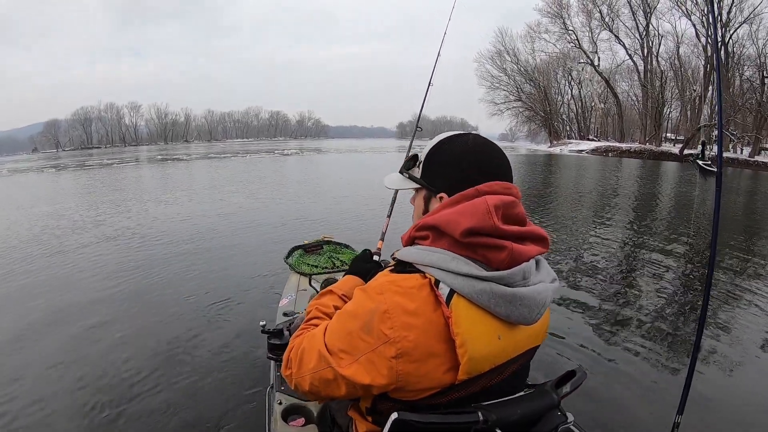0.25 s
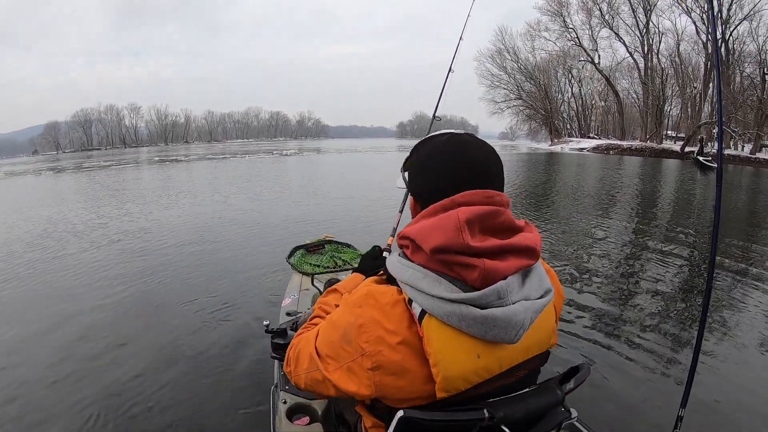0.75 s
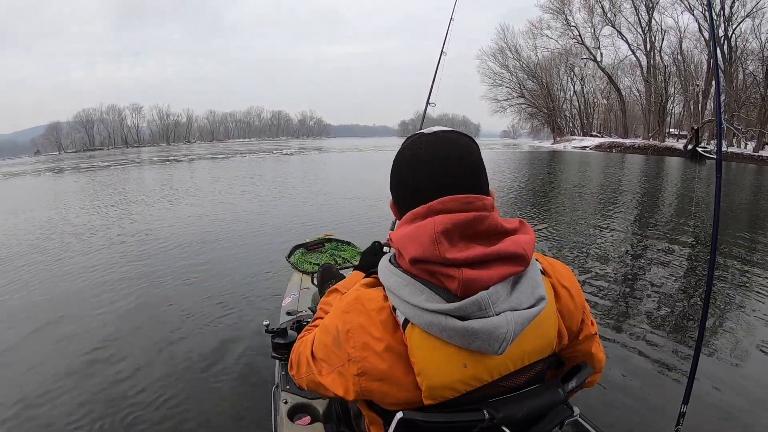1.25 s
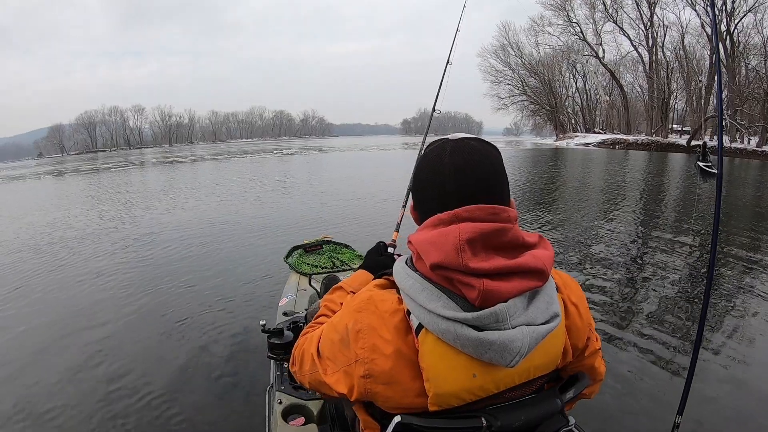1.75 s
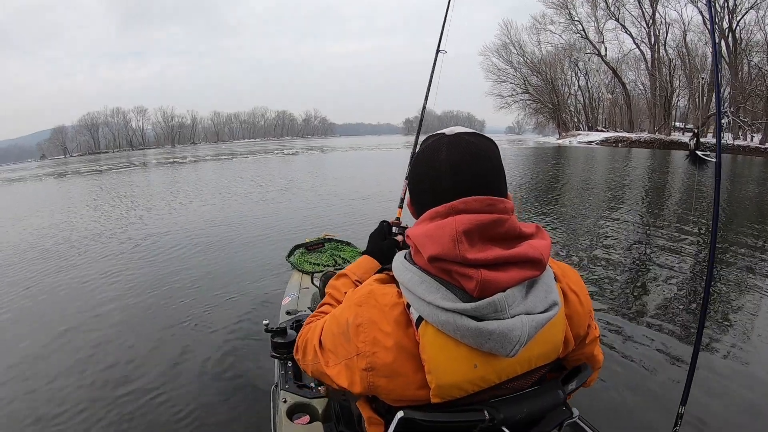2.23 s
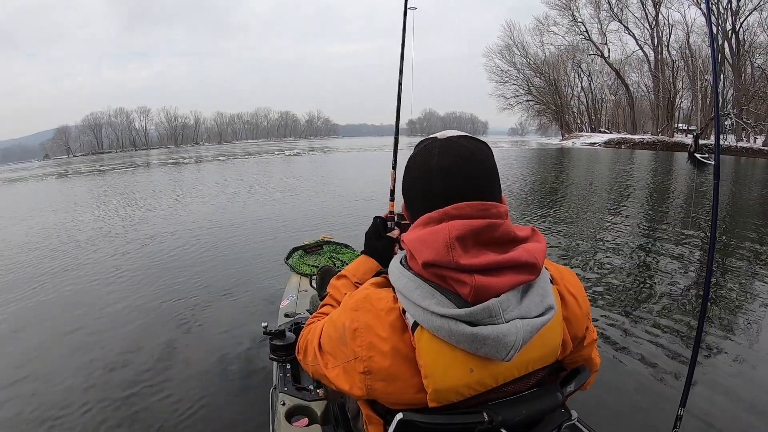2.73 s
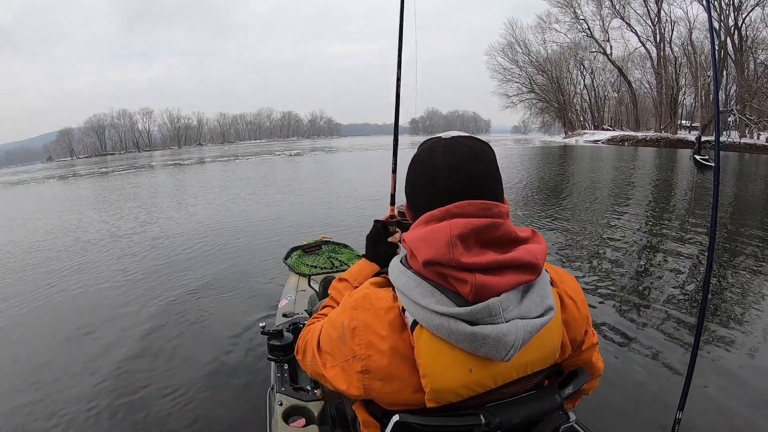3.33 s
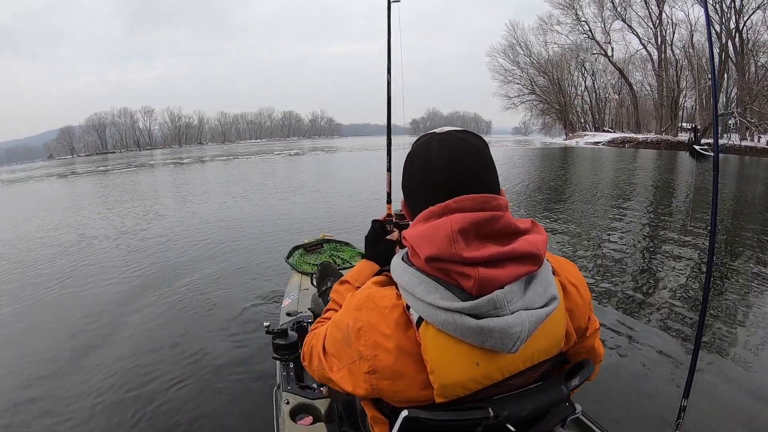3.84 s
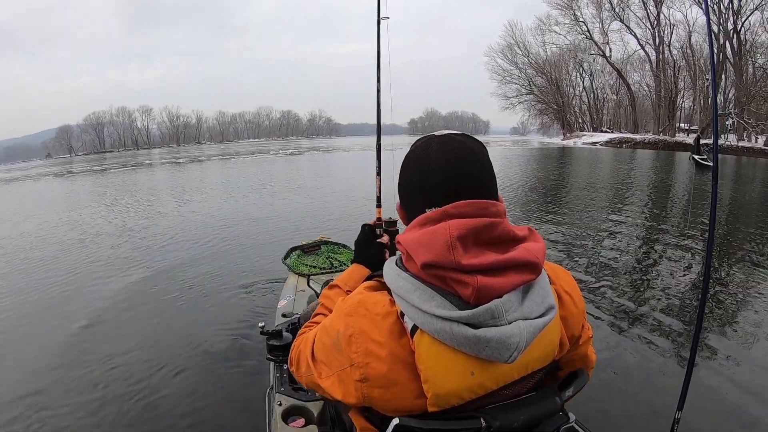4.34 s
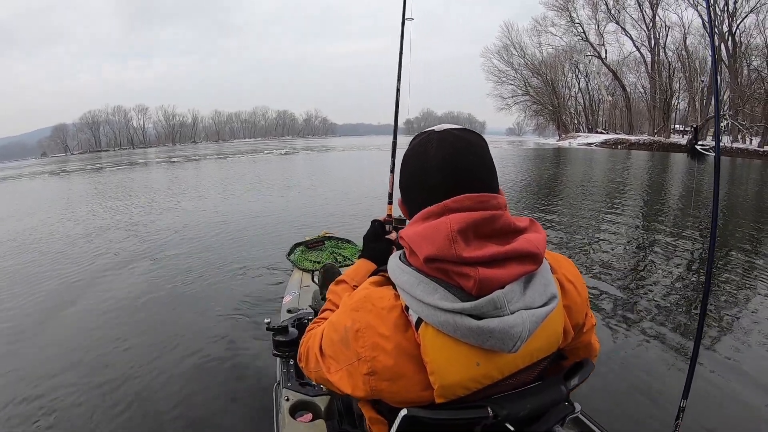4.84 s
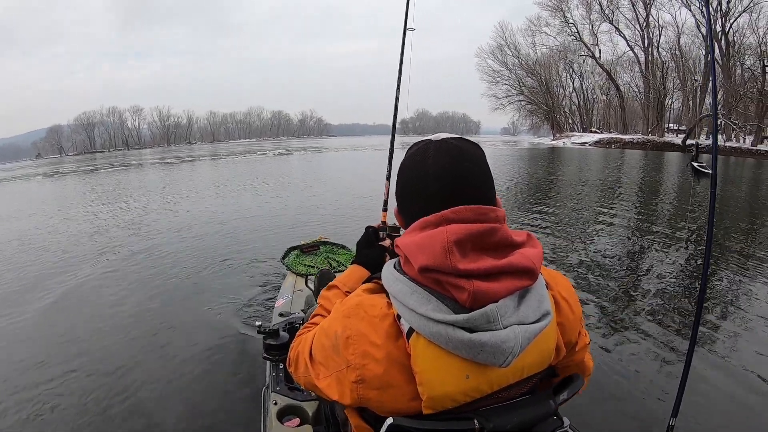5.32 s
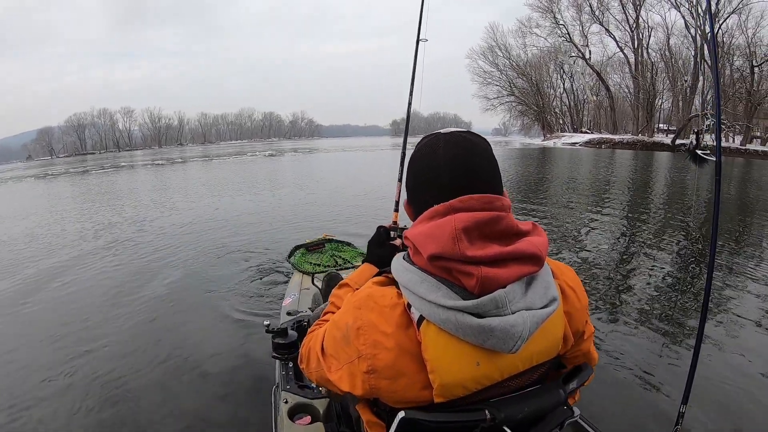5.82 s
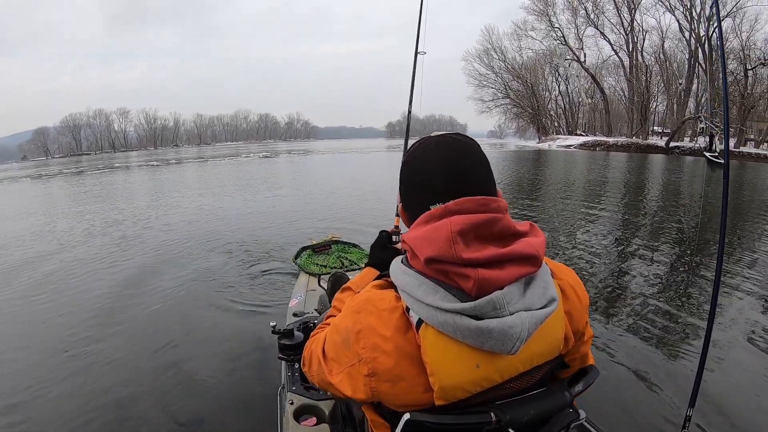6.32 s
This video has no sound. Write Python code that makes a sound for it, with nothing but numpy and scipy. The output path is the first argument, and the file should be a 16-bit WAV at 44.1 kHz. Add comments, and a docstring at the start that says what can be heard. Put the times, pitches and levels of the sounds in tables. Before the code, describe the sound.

Irregular hollow thuds on a plastic boat hull, heard from just behind the sitter, with no echo. The strongest come in quick clusters near the start and the end; between them are a quieter stretch of light dry ticks from fishing gear, small gulps of water against the side, soft hull drumming, faint cloth hiss and a mild rumble of air on the microphone.

```python
"""Angler in a plastic kayak

An angler shifts about in a plastic kayak on a calm river, just in front of the microphone.
Boots and gear knock on the hollow hull: decaying tones for wall and panel, fading noise for the clacks.
Rod and reel give dry taps, gear scrapes over the deck, and a stiff jacket rustles as filtered noise.
Water laps as short rising tones and drums softly on the hull as slow-swelling noise, with a light breeze."""
import sys
import numpy as np
from scipy import signal
from scipy.fft import rfft, irfft
from scipy.io import wavfile
from scipy.ndimage import uniform_filter1d

SR = 44100
rng = np.random.default_rng(int(sys.argv[2]) if len(sys.argv) > 2 else 0)


def to_wav(s):
    """Save 16-bit WAV."""
    ch = np.atleast_2d(s).T  # columns
    pcm = np.round(np.clip(ch, -1, 1) * 32767)  # PCM
    wavfile.write(sys.argv[1], SR, pcm.astype(np.int16))


N = 289737  # length of the scene in samples
TIME = np.arange(N) / SR  # seconds since the scene began
AGE = np.arange(SR // 2) / SR  # seconds since a contact, up to half a second

# borders between thump, body, clack and tick, and the top of the whole scene
THUMP_TOP_HZ, BODY_TOP_HZ, CLACK_TOP_HZ, EDGE_HZ = 400, 1200, 4500, 15600


# Blows on the hull. Each row: start in seconds, thump level in dB, panel pitch in Hz,
# thump fade time (to -60 dB) in seconds, body level in dB, body pitch in Hz,
# clack level in dB, clack pitch in Hz, tick level in dB.
HULL_BLOWS = [(0.018, -21, 209, 0.11, -37.5, 440, -38.5, 2900, -89.5),
              (0.354, -26.5, 218.3, 0.26, -33.5, 611, -51, 1990, -71),
              (0.642, -16.5, 257.5, 0.1, -18, 443, -24.5, 1333, -48.5),
              (0.666, -14.5, 219.5, 0.1, -31.5, 490, -47, 1420, -76),
              (0.691, -23.5, 297, 0.13, -28.5, 590, -39, 1570, -70),
              (1.257, -22, 224.7, 0.18, -40.5, 524, -62, 2850, -73),
              (1.409, -33, 242, 0.04, -37.5, 632, -53.5, 1850, -61.5),
              (1.671, -24, 199.2, 0.14, -34, 517, -48, 2270, -65),
              (1.958, -30, 292, 0.11, -37.5, 550, -61, 1310, -78),
              (2.18, -27, 151, 0.16, -43.5, 560, -49, 2260, -62),
              (4.905, -27.5, 158.3, 0.13, -58, 680, -63, 3553, -87),
              (5.134, -39, 433, 0.25, -34.5, 424, -53.5, 2540, -67),
              (5.177, -28.5, 198.7, 0.11, -31.5, 458, -39.5, 1870, -60.5),
              (5.723, -29, 271, 0.1, -45, 464, -52, 2030, -89),
              (6.045, -17, 329, 0.029, -24, 756, -33.5, 1502, -49),
              (6.061, -15, 179.3, 0.16, -24.5, 735, -38, 2360, -52),
              (6.156, -24.5, 256, 0.11, -35.5, 721, -49, 2261, -85),
              (6.207, -29.5, 242.2, 0.43, -41, 510, -60, 2720, -62)]


def knocks():
    """A blow on the hull ticks and clacks, the wall rings and a broad panel thumps."""
    out = np.zeros(N)
    for s, thump_db, hz, t60, body_db, body_hz, clack_db, clack_hz, tick_db in HULL_BLOWS:
        ring = wall(damping=1.0)
        linger = gain_of(0.74 * (thump_db + 20.5))  # heavy blows chatter longer than light ones

        body = gain_of(-5.0) * ring
        body += gain_of(-6.5) * spot(body_hz, t60=0.088, width=0.27)
        body += crack(t60=0.093, tail_db=-11.0, tail_t60=0.13)

        clack = gain_of(-18.5) * ring
        clack += crack(t60=0.052 * linger, tail_db=-25, tail_t60=0.32 * linger,
                       hz=clack_hz, lift_db=11.5, octaves=0.2)
        clack *= onset(0.00053)
        tick = crack(t60=0.048 * linger, tail_db=-31, tail_t60=0.26 * linger) * onset(0.0052)

        blow = gain_of(body_db) * crested(band(body, THUMP_TOP_HZ, BODY_TOP_HZ))
        blow += gain_of(clack_db) * crested(band(clack, BODY_TOP_HZ, CLACK_TOP_HZ, order=4))
        blow += gain_of(tick_db) * crested(band(tick, CLACK_TOP_HZ, EDGE_HZ))
        blow += gain_of(thump_db) * thump(hz, t60)
        add(out, s, blow)
    return out


def thump(hz, t60, rise_s=0.0069, side_db=-8):
    """A broad panel swings up slowly and drags its lower and higher neighbours along."""
    panel = np.sin(2 * np.pi * hz * AGE) * dying(t60)
    for ratio in (0.68, 1.33, 1.8):
        neighbour = np.sin(2 * np.pi * (hz * ratio * AGE + rng.random()))
        panel += gain_of(side_db) * neighbour * dying(t60 / ratio)
    # the air inside the hull answers with a low, fading noise
    cavity = evened(band(rng.standard_normal(len(AGE)), 114.4, 277, order=2)) * dying(0.29)
    return crested((panel + gain_of(-13.0) * cavity) * onset(rise_s))


# Ways the hull wall likes to ring (modes).
# Each row: pitch in Hz, relative level in dB, fade time (to -60 dB) in seconds.
WALL_MODES = [(394, 10.5, 0.11), (514, 7.5, 0.069), (536, 0, 0.2), (636, -2.5, 0.25), (700, -7.5, 0.24),
              (770, -12, 0.36), (830, -2.5, 0.14), (990, -25.5, 0.16), (1085, -32.5, 0.057),
              (1330, 0, 0.12), (1600, 1, 0.045), (1980, 1.5, 0.076), (2060, 2.5, 0.19), (2180, -15, 0.19),
              (2800, -31, 0.17), (3005, 13.5, 0.044), (2920, -45.5, .06), (3800, -22, 0.18),
              (4130, -13, .05), (4120, -13, 0.11)]


def wall(damping):
    """The hull wall rings in many modes; each blow weights them differently, at random."""
    weights = rng.choice([-1, 1], len(WALL_MODES)) * rng.uniform(0.31, 1, len(WALL_MODES))
    ring = np.zeros(len(AGE))
    for weight, (hz, db, t60) in zip(weights, WALL_MODES):
        ring += weight * gain_of(db) * np.sin(2 * np.pi * hz * AGE) * dying(t60 / damping)
    return crested(ring)


def spot(hz, t60, width=0.12, count=5):
    """The struck spot rings at its own pitch, with a few weaker modes close by."""
    ratios, turns = rng.random((2, count, 1))
    near_hz = hz * (1 + 2 * width * (ratios - 0.5))
    near = np.sin(2 * np.pi * (near_hz * AGE + turns)).sum(0) / count
    return crested((np.sin(2 * np.pi * hz * AGE) + near) * dying(t60))


# Tone colour of hard contact on plastic, also used by the slides.
# Each row: frequency in Hz, relative level in dB per Hz.
CONTACT_COLOUR = [(100, -12.5), (230, 17), (400, 7.5), (700, -7), (1300, -12.5), (2000, -9.5),
                  (3200, -15.5), (4300, -18), (5200, -21.5), (7500, -22), (10000, -32), (15000, -51.5)]


def crack(t60, tail_db, tail_t60, hz=1000, lift_db=0, octaves=0.3):
    """Noise stands for countless damped modes of the plastic, with a faint tail from inside the hull."""
    noise = coloured(rng.standard_normal(len(AGE)), CONTACT_COLOUR)
    dense = evened(focused(noise, hz, lift_db, octaves))
    return dense * (dying(t60) + gain_of(tail_db) * dying(tail_t60))


def focused(x, hz, lift_db, octaves):
    """The size of the touching part favours a broad band around hz."""
    f = np.fft.rfftfreq(len(x), 1 / SR) + 1
    lift = lift_db * np.exp(-(np.log2(f / hz) / octaves) ** 2)
    return irfft(rfft(x) * gain_of(lift), len(x))


def onset(rise_s):
    """A short smooth fade-in over about rise_s seconds."""
    return 1 - np.exp(-(AGE / rise_s) ** 2)


# Small hard contacts of rod and gear. Each row: start in seconds, body level in dB,
# body pitch in Hz, clack level in dB, clack pitch in Hz, tick level in dB.
GEAR_TAPS = [(0.744, -39, 1292, -50, 2300, -76), (1.161, -72, 950, -71, 1850, -70),
             (1.394, -53, 644, -61, 1860, -75), (1.469, -40, 680, -63, 3130, -87),
             (1.654, -63, 797, -50, 2080, -67), (1.907, -48, 625, -61, 2340, -73),
             (2.092, -53, 1168, -54.5, 1940, -66), (2.289, -54.5, 1410, -58, 2600, -90),
             (2.495, -52, 905, -59, 1730, -79), (2.541, -56.5, 1400, -63, 2330, -77),
             (3.087, -51, 1620, -81, 1640, -98), (3.61, -67, 1287, -83, 2110, -68),
             (3.69, -62, 1427, -59, 1760, -70), (3.77, -29, 1120, -48, 3671, -57.5),
             (3.899, -49, 780, -56.5, 3430, -85), (4.006, -48, 960, -58, 2240, -66.5),
             (4.194, -32.5, 1160, -44, 2230, -61.5), (4.225, -48, 1060, -52, 1500, -88),
             (4.509, -49, 1157, -46.5, 1650, -65), (4.549, -34.5, 1210, -50, 1680, -69),
             (4.829, -52.5, 1030, -53, 2000, -70), (4.883, -44.5, 600, -52.5, 3488, -71),
             (4.958, -66, 969, -56, 3569, -82), (5.029, -48.5, 1290, -63, 1690, -89),
             (5.177, -39, 1270, -48, 2300, -63), (5.314, -51, 861, -52, 2840, -76),
             (5.59, -62, 905, -56, 3530, -68), (5.665, -40.5, 690, -54, 3490, -58),
             (5.669, -46, 770, -46, 3400, -49.5), (5.697, -44, 865, -54, 2460, -74),
             (5.789, -50.5, 797, -58, 1616, -69), (6.082, -26.5, 560, -39, 2560, -54.5),
             (6.132, -48, 877, -52.5, 1730, -76), (6.147, -55, 700, -61, 2450, -63),
             (6.157, -49, 806, -51, 2200, -87), (6.216, -47, 619, -53.5, 3120, -60)]


def taps():
    """Light contacts die away quickly and only nudge the hull."""
    out = np.zeros(N)
    for s, body_db, body_hz, clack_db, clack_hz, tick_db in GEAR_TAPS:
        rattle = crack(t60=0.038, tail_db=-20.5, tail_t60=0.38, hz=body_hz, lift_db=0.5)
        body = spot(body_hz, t60=0.011, width=0.26) + gain_of(8) * band(rattle, 570, 1400)
        body *= onset(0.0012)
        clack = crack(t60=0.028, tail_db=-20.5, tail_t60=0.23, hz=clack_hz, lift_db=8.0, octaves=0.25)
        clack *= onset(0.0019)
        tick = crack(t60=0.02, tail_db=-20, tail_t60=0.1) * onset(0.0015)
        nudge = crested(np.sin(2 * np.pi * 235 * AGE) * AGE * dying(0.013))

        tap = gain_of(body_db) * (crested(body) + gain_of(2.0) * nudge)
        tap += gain_of(clack_db) * crested(band(clack, 1450, CLACK_TOP_HZ, order=4))
        tap += gain_of(tick_db) * crested(band(tick, CLACK_TOP_HZ, EDGE_HZ))
        add(out, s, tap)
    return out


# Gear dragged over the deck. Each row: middle in seconds, length in seconds,
# ring level in dB, ringing pitch in Hz, grit level in dB (both levels before the fade in and out).
DECK_SLIDES = [(0.777, .14, -50, 990, -49), (0.841, 0.18, -47, 940, -52.5), (0.858, .18, -48.5, 1320, -55),
               (1.192, 0.083, -74, 1590, -60.5), (1.408, 0.049, -48, 645, -55),
               (1.499, 0.088, -60, 717, -64.5), (1.615, .18, -54, 840, -57.5), (4.021, .12, -59, 600, -65),
               (4.325, .1, -75, 2110, -58), (4.55, .08, -52, 694, -58), (4.553, .03, -46, 1660, -55),
               (5.676, 0.071, -47, 690, -49.5), (5.813, .08, -70, 790, -57),
               (6.046, 0.037, -29.5, 529, -41), (6.067, 0.038, -30.5, 756, -36),
               (6.226, 0.2, -53, 600, -66)]


def slides(width=0.053, slips_per_s=600):
    """Dense little slips keep one wall mode ringing, with grit around it."""
    out = np.zeros(N)
    for s, length, ring_db, hz, grit_db in DECK_SLIDES:
        size = int(length * SR)
        slips = rng.standard_normal(SR) * (rng.random(SR) < slips_per_s / SR)
        ring = evened(band(slips, hz / (1 + width), hz * (1 + width), order=2))
        grit = evened(band(coloured(slips, CONTACT_COLOUR), 890, 4250, order=5))
        slide = gain_of(ring_db) * ring + gain_of(grit_db) * grit
        add(out, s - length / 2, slide[:size] * signal.windows.hann(size))
    return out


# Wavelets slapping the side. Each row: start in seconds, level in dB before each pocket's cut,
# starting pitch of the first pocket of trapped air in Hz, fade time (to -60 dB) in seconds.
SIDE_LAPS = [(0.134, -37, 447, 0.052), (0.157, -26, 373, 0.03), (0.183, -36, 413, 0.047),
             (1.484, -31, 584, 0.064), (1.573, -34.5, 727, 0.092), (1.612, -32, 369, 0.073),
             (1.966, -42, 414, 0.075), (1.992, -31.5, 369, 0.14), (2.494, -35, 520, 0.034),
             (2.543, -36.5, 558, 0.11), (2.86, -46, 923, 0.062), (3.984, -37.5, 546, 0.11),
             (4.007, -31, 374, 0.052), (4.05, -35, 470, 0.035), (4.348, -34.5, 532, 0.032),
             (4.525, -27, 643, 0.055), (4.579, -27.5, 358, 0.027), (5.021, -36, 285, 0.11),
             (5.181, -21, 381, 0.086), (5.207, -30.5, 349, 0.15), (5.729, -26, 390, 0.026),
             (6.245, -35.5, 439, 0.021)]


def laps(count=3, glide=0.36, spread_s=0.0128):
    """Each wavelet traps a few pockets of air that ring briefly and rise in pitch."""
    out = np.zeros(N)
    for s, db, hz, t60 in SIDE_LAPS:
        for k, (size, delay) in enumerate(rng.random((count, 2))):
            pitch = hz * (1 + 0.59 * (size - 0.5) * (k > 0))  # only later pockets stray in pitch
            tone = np.sin(2 * np.pi * pitch * AGE * (1 + glide * AGE))
            pocket = tone * dying(t60) * onset(0.0011)
            pocket_db = db - 3.84 * (k + 2.0)  # each pocket is weaker than the one before
            add(out, s + spread_s * delay * k, gain_of(pocket_db) * crested(pocket))
    return out


def drips(count=70, base_db=-62, t60=0.0099):
    """Tiny bubbles burst at random along the waterline, each a short rising tone."""
    out = np.zeros(N)
    for when, small, strength in rng.random((count, 3)):
        hz = 600 * 4 ** small
        bubble = np.sin(2 * np.pi * hz * AGE * (1 + 3 * AGE)) * dying(t60) * onset(0.00092)
        db = base_db + 10 * strength - 20 * small  # smaller bubbles are higher and mostly quieter
        add(out, when * N / SR, gain_of(db) * crested(bubble))
    return out


# Tone colour of the rubbing cloth. Each row: frequency in Hz, relative level in dB per Hz.
JACKET_COLOUR = [(150, -47.5), (500, 9), (950, 0), (1100, -1), (1330, 6.5), (2100, -2.5), (3000, -3.5),
                 (4100, -7.5), (4800, -11.5), (6000, -18), (7400, -10), (9000, -19.5), (11000, -27.5),
                 (15000, -42)]
# Arm movements that rub the jacket, also used by the creases.
# Each row: middle in seconds, length in seconds, hiss level in dB before the flicker.
ARM_MOVES = [(0.25, 0.81, -66.5), (0.66, 0.18, -51), (0.84, .15, -46), (1.18, 0.34, -64),
             (1.61, 0.13, -60.5), (1.85, .42, -63.5), (2.4, 0.53, -75), (3.8, 0.47, -68.5),
             (4.47, 0.35, -64), (5.0, 0.65, -67), (5.54, 0.22, -60), (6.1, 0.26, -60), (6.55, 0.38, -66.5)]
CALM_JACKET_DB = -92  # while the angler is at rest


def jacket():
    """Coated cloth slides on itself with each arm movement: a fine hiss with tiny crinkles."""
    crinkles = rng.standard_normal(N) * (rng.random(N) < 500 / SR)  # about 500 per second
    cloth = evened(coloured(rng.standard_normal(N) + 0.51 * evened(crinkles), JACKET_COLOUR))
    flicker = gain_of(2.3 * drift(35))
    return cloth * swells(ARM_MOVES, CALM_JACKET_DB) * flicker


def creases(count=80, base_db=-2.5, spread_db=9, loudest_db=-62.0):
    """Folds of the stiff cloth snap over at random, louder while the arms move."""
    out = np.zeros(N)
    effort = np.minimum(swells(ARM_MOVES, CALM_JACKET_DB), gain_of(loudest_db))
    for when, strength, small in rng.random((count, 3)):
        at = int(when * N)
        snap = crack(t60=0.016, tail_db=-15.5, tail_t60=0.06, hz=2000 * 2 ** small, lift_db=8.5)
        snap = crested(band(snap * onset(0.00073), 1500, EDGE_HZ))
        add(out, at / SR, effort[at] * gain_of(base_db + spread_db * strength) * snap)
    return out


# Ways the air inside the hollow hull likes to swing.
# Each row: pitch in Hz, width in Hz, relative level in dB.
AIR_MODES = [(163.2, 28.8, 0.5), (215.3, 36.2, 0)]
# Tone colour of ripples on the hull skin. Each row: frequency in Hz, relative level in dB per Hz.
DRUM_COLOUR = [(50, -41.5), (90, 0), (130, 1.5), (190, 5.5), (290, 2), (420, -8.5), (600, -24.5),
               (1200, -74)]
# Tone colour of the river's wash. Each row: frequency in Hz, relative level in dB per Hz.
WASH_COLOUR = [(100, -13), (300, 1), (450, 3.5), (740, -2), (900, -4.5), (1400, -9), (2200, -17.5),
               (3500, -26), (5000, -37.5), (8000, -44.5), (11000, -57), (15000, -64.5)]
# The boat rocks and stirs the water. Each row: middle in seconds, length in seconds,
# drumming level in dB, wash level in dB (both before the flicker).
BOAT_ROCKS = [(0.118, 0.21, -36, -67), (0.76, 0.29, -41, -48.5), (1.061, .09, -41, -73),
              (1.602, 0.23, -37, -51.5), (2.105, 0.13, -42.5, -65), (3.953, 0.95, -44, -55),
              (4.577, 0.18, -41.5, -54.5), (4.93, 0.24, -46, -53), (5.753, 0.2, -38, -53),
              (6.237, .2, -36.5, -51.5)]
CALM_DRUM_DB, CALM_WASH_DB = -46, -57  # while the boat is at rest


def water():
    """Ripples drum on the hull and stir the air in it, under the river's wash; both grow with rocking."""
    s, length, drum_db, wash_db = np.array(BOAT_ROCKS).T

    ripples = rng.standard_normal(N)
    hollow = np.zeros(N)
    for hz, width, db in AIR_MODES:
        hollow += gain_of(db) * evened(band(ripples, hz - width / 2, hz + width / 2, order=2))
    skin = evened(coloured(rng.standard_normal(N), DRUM_COLOUR))
    drum = evened(evened(hollow) + gain_of(-0.5) * skin)
    drum *= swells(zip(s, length, drum_db), CALM_DRUM_DB) * gain_of(1.15 * drift(34))

    splashes = rng.standard_normal(N) * (rng.random(N) < 250 / SR)  # about 250 per second
    wash = evened(coloured(rng.standard_normal(N) + 0.23 * evened(splashes), WASH_COLOUR))
    wash *= swells(zip(s, length, wash_db), CALM_WASH_DB) * gain_of(0.71 * drift(25))
    return drum + wash


# Tone colour of air on the microphone. Each row: frequency in Hz, relative level in dB per Hz.
RUMBLE_COLOUR = [(10, -8), (25, -5.5), (42, 4), (55, -5.5), (72, 2.5), (95, -10.5), (140, -23), (400, -75)]
# Puffs of air on the microphone.
# Each row: middle in seconds, length in seconds, rumble level in dB before the slow wavering.
AIR_PUFFS = [(0.05, .1, -42.5), (0.7, 0.088, -48), (1.02, 0.12, -47), (1.3, .12, -45), (2.1, 0.32, -50),
             (3.53, .08, -48), (4.45, 0.16, -41), (4.8, 0.44, -48), (5.84, 0.14, -40.5),
             (6.17, 0.32, -44.5)]
CALM_AIR_DB = -50.5  # between the puffs


def breeze():
    """Moving air buffets the microphone lightly and unevenly: a low rumble of filtered noise."""
    rumble = evened(coloured(rng.standard_normal(N), RUMBLE_COLOUR))
    return rumble * swells(AIR_PUFFS, CALM_AIR_DB) * gain_of(3.2 * drift(3.2))


def swells(rows, calm_db):
    """Each (middle s, length s, dB) rises and falls as a bell above a steady level; their powers add."""
    power = sum(gain_of(db) ** 2 * np.exp(-(2 * (TIME - s) / length) ** 2) for s, length, db in rows)
    return np.sqrt(gain_of(calm_db) ** 2 + power)


def drift(per_s):
    """Smooth random wandering of rms 1; a higher per_s makes it faster."""
    f = np.fft.rfftfreq(N, 1 / SR)
    return evened(irfft(rfft(rng.standard_normal(N)) * np.exp(-(f / per_s) ** 2), N))


def dying(t60):
    """Decay that loses 60 dB in t60 seconds."""
    return np.exp(-np.log(1000) * AGE / max(t60, 1e-3))


def coloured(x, points):
    """Filters by a spectrum drawn on a log-frequency axis."""
    hz, db = np.transpose(points)
    f = np.fft.rfftfreq(len(x), 1 / SR)
    curve_db = np.interp(np.log(f + 1), np.log(hz), db)
    return irfft(rfft(x) * gain_of(curve_db), len(x))


def band(x, lo_hz, hi_hz, order=3):
    """Keeps the sound between two frequencies, without smearing it backwards in time."""
    edges = [lo_hz, min(hi_hz, SR / 2 - 1)]
    return signal.sosfilt(signal.butter(order, edges, "band", fs=SR, output="sos"), x)


def gain_of(db):
    """Decibels to amplitude."""
    return 10 ** (np.asarray(db) / 20)


def evened(x):
    """Scales to rms 1."""
    return x / np.sqrt(np.mean(x ** 2) + 1e-20)


def crested(x, size=220):
    """Scales so that the loudest 5 ms (220 samples) have rms 1."""
    return x / np.sqrt(uniform_filter1d(x ** 2, size).max() + 1e-20)


def add(mix, s, sound):
    """Mixes a sound in at time s, cutting off what runs past the end."""
    part = mix[max(round(s * SR), 0):][:len(sound)]
    part += sound[:len(part)]


def scene():
    """Open water returns no echo, so all sources are simply added, dry."""
    boat = knocks() + taps() + slides()
    lapping = laps() + drips()
    cloth = jacket() + creases()
    return (boat + lapping + cloth + water() + breeze())[None]


def record(dry):
    """The recorder's band limit: a steep low-pass filter at EDGE_HZ."""
    low_pass = signal.firwin(511, EDGE_HZ, window=("kaiser", 9), fs=SR)
    return signal.oaconvolve(dry, low_pass[None], "same")


dry = scene()
out = record(dry)
to_wav(out)
```